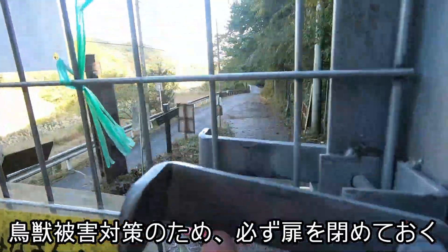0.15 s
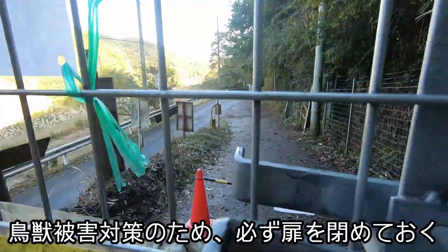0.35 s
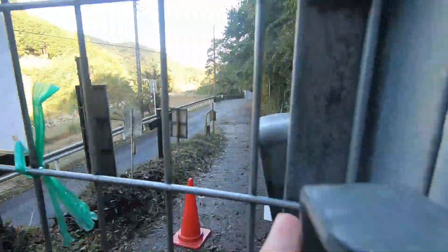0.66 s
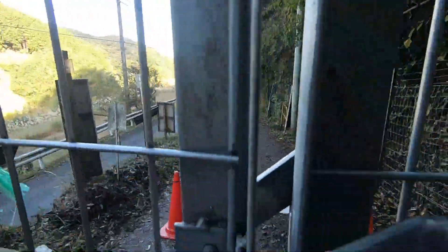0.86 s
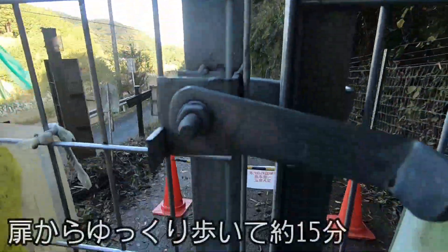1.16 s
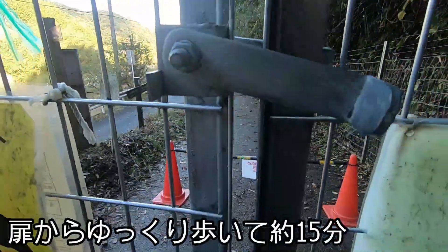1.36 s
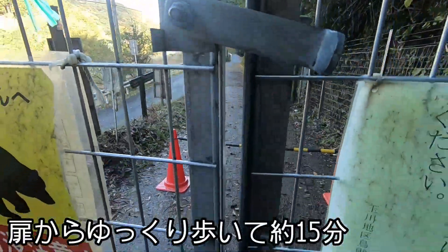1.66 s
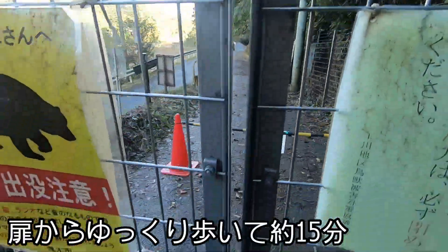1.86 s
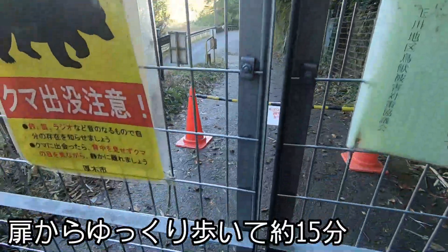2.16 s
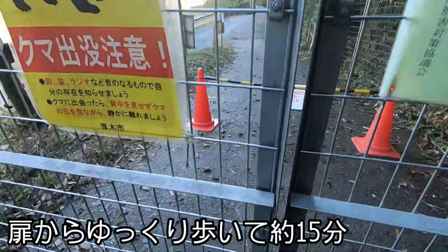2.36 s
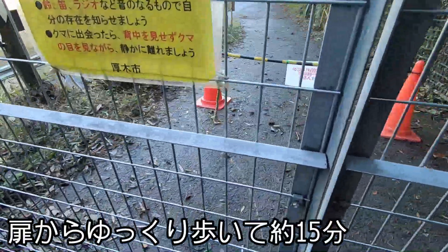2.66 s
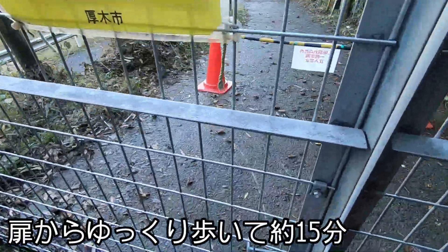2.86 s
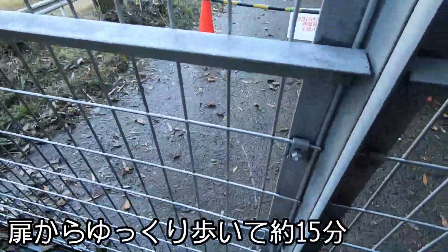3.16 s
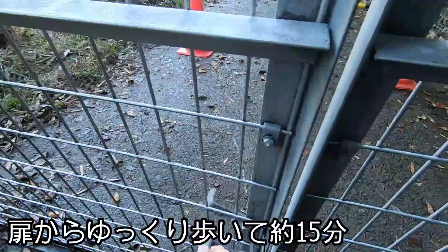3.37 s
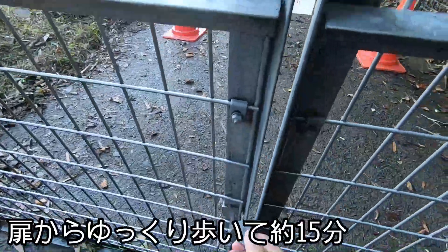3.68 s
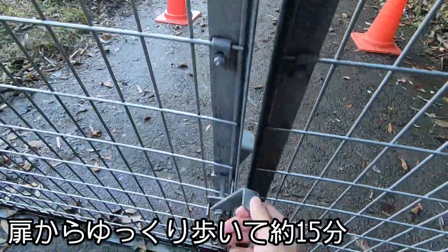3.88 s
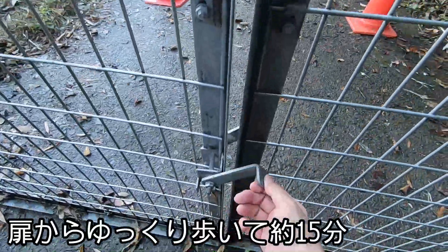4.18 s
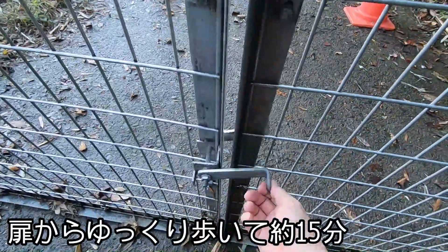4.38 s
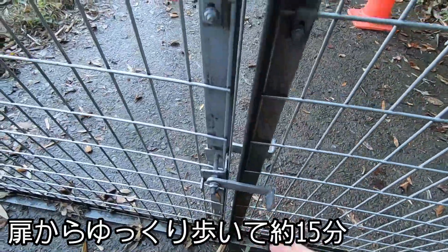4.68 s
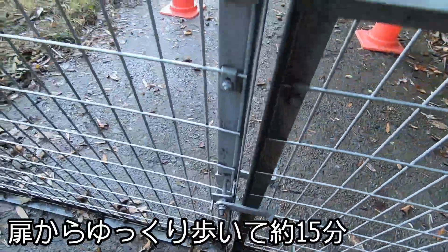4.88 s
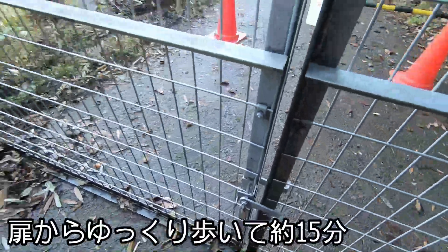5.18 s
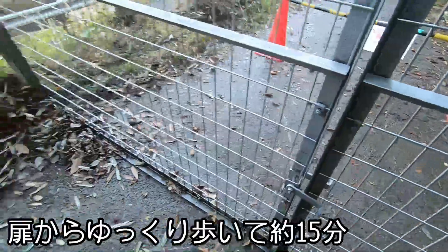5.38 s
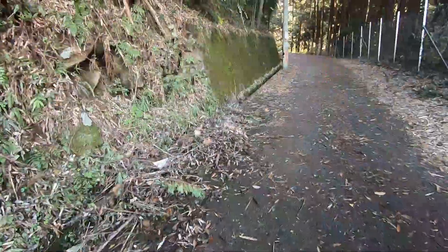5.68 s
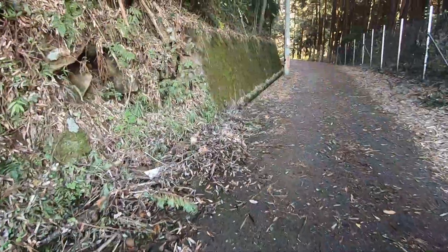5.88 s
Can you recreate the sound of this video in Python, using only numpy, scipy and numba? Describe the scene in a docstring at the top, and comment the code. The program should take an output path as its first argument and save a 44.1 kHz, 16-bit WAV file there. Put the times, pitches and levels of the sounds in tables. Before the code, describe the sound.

Low wind buffeting, strongest early, covers a thin valley hiss. Light latch knocks lead to bright, hard metal blows and scraping around one second, close to a handheld stereo microphone. Quiet gritty scuffs follow; near four seconds another latch rings in short clanks, with a final separate clack. The image narrows almost to mono, then widens, in dry open air with a slight echo off a bank.

```python
"""Wind buffets the two ports of a hand-held camera outdoors, over a distant hiss that fills the valley.
Then an arm's length away a steel mesh gate is pushed shut and two latch bars are dropped: each blow rings
decaying modes of bars and wires, and dense contacts make the frame grind. Damped swings are bumps on the
housing, bursts of filtered grains are shoe scuffs, and bands of swelling noise are the wind and hiss.
The stereo image narrows to mono by about 1.5 s, then opens out again."""
import sys
import numpy as np
from scipy import signal
from scipy.fft import rfft, irfft
from scipy.io import wavfile
from scipy.ndimage import uniform_filter1d
from numba import njit

SR = 44100
rng = np.random.default_rng(int(sys.argv[2]) if len(sys.argv) > 2 else 0)


def voltage_ratio(decibels):
    """Convert decibels (scalar or array-like) to amplitude ratios, 20 dB per decade."""
    exponent = np.asarray(decibels, float) / 20
    return 10 ** exponent


def to_wav(sig):
    """Store sig (one row per channel, or 1-D mono) as 16-bit WAV at the path in sys.argv[1].

    Samples outside -1..1 are clipped; the rate is SR.
    """
    pcm = np.clip(np.atleast_2d(sig), -1, 1) * 32767
    pcm = np.round(pcm).astype(np.int16)
    wavfile.write(sys.argv[1], SR, pcm.T)  # frames by channels


N = 266364
T = np.arange(N) / SR  # time of each sample, s

# blows on the gate: t/s, nominal peak level/dB, centre of the ring f/Hz, lift there/dB, brightness/(dB per octave)
BLOWS = [(0.277, -34.5, 1420, 8, -1), (.294, -23, 2200, 4, -0.5), (.487, -31, 2014, 8.5, -7.5),
         (.519, -19.5, 2060, 11.5, 1.2), (.529, -30.5, 2580, 11.5, 1), (0.903, -14.5, 1612, -3, 4),
         (.911, -13.5, 2240, 16, 6.5), (.917, -12, 3270, 7, 2.5), (.93, -29.5, 1705, 4.5, 1.5),
         (1.039, -19.5, 4290, 15, 9), (1.048, -13.5, 3310, 6.5, 6), (1.057, -25.5, 3400, 12.5, -10),
         (1.085, -33, 2190, 15, -3), (1.201, -22.5, 1590, 9.5, -2.5), (3.744, -28, 2460, 8, -1),
         (3.844, -32.5, 2070, 11.5, -7), (4.024, -14.5, 2800, 8, 1.5), (4.051, -20, 2410, 13, -8),
         (4.16, -27.5, 2460, 10, -6), (4.244, -11, 2800, 17, 4), (4.255, -12.5, 2680, 18.5, -4.5),
         (4.289, -29, 2410, 1, -0.5), (4.403, -32.5, 2130, 15, -14.5), (4.428, -26.5, 2700, 12, -3),
         (4.492, -24.5, 3250, 2, 0), (4.605, -34.5, 2450, 8, -6), (4.75, -12.5, 3220, 11, 2.5),
         (4.91, -37.5, 2220, 1, -6)]
# the frame grinds against the post: t of the peak/s, peak level/dB, rise/(dB/s), fall of the later chatter/(dB/s)
GRINDS = [(0.908, -19, 1300, 88), (1.066, -20, 441, 104), (1.212, -31.5, 520, 43.5),
          (1.48, -55.5, 500, 301)]
# modes of the gate and latch bars: f/Hz, relative level/dB, nominal t60/s
BAR_MODES = [(1170, -4, 0.081), (1540, -3, 0.22), (1693, 0.5, 0.19), (1772, 1, 0.08), (2070, 10, 0.032),
             (2206, 1, 0.18), (2450, -4, 0.21), (2605, -0.5, 0.1), (2727, 6.5, 0.1), (2988, 1, 0.073),
             (3203, 5.5, 0.07), (3124, -4.5, 0.17), (3320, -6.5, 0.16), (3438, 4, 0.085),
             (3670, -12.5, 0.16), (3764, -2.5, 0.18), (4550, -17.5, 0.16), (4715, -4.5, 0.19),
             (5570, -10.5, .15), (6060, -21, 0.23), (5650, -1.5, 0.086), (7250, -32, 0.1), (7400, -20, 0.1)]
# colour of the mesh wires: f/Hz, relative level/(dB per Hz)
MESH_COLOUR = [(240, -78), (400, -47.5), (738, -8), (942, -38), (1190, -9), (2190, 0), (2590, -7.5),
               (2840, -15), (4350, -11), (4700, -11.5), (6380, -16.5), (7210, -14), (10500, -39),
               (15500, -69.5)]
# typical decay of the mesh wires: f/Hz, nominal t60/s
MESH_DECAY = [(600, 0.6), (1600, 0.068), (4200, 0.13), (11000, 0.15)]
# shoe scuffs and small ticks: t/s, nominal peak level/dB, centre f/Hz, t60/s
SCUFFS = [(1.836, -44.5, 1130, 0.099), (1.955, -41, 1140, 0.072), (2.442, -46, 1540, 0.079),
          (2.53, -56.5, 695, .045), (3.155, -46, 1950, 0.26), (3.164, -67, 5100, .091),
          (3.276, -44.5, 1790, .07), (3.426, -48, 1950, 0.12), (3.502, -42.5, 1720, 0.22),
          (3.557, -43, 1590, 0.087), (5.02, -64, 5500, .041), (5.298, -64, 5500, .052),
          (5.66, -57, 666, 0.017), (5.738, -53.5, 3670, 0.071), (5.783, -58, 1750, 0.044),
          (5.834, -47.5, 1520, 0.08)]
# bumps on the housing: t/s, swing level/dB, f/Hz, swing length/s, snap level/dB, signed size of the first swing
BUMPS = [(.281, -8, 60.6, .0073, -38.5, 1), (.524, -11.5, 101.3, .0058, -47, -.56),
         (1.428, -33.5, 115, .0052, -60, -1.1), (.971, -21.5, 72, .0021, -60, -1),
         (.981, -11.5, 51.5, .01, -35, -1)]
# strength of the wind on the ports between gusts: t/s, level/dB
WIND_STRENGTH = [(0, -27.5), (.25, -30.5), (.45, -30), (.9, -26), (1.25, -29), (1.37, -31.5), (1.75, -36.5),
                 (2.1, -29.5), (2.3, -37.5), (2.65, -40), (2.95, -31), (3.35, -38), (3.55, -42),
                 (3.75, -31.5), (4.4, -39), (4.5, -45), (5.4, -40.5), (6.04, -39.5)]
# turbulence as buffet, flutter, housing drone, rush: centre f/Hz, width/Hz, level/dB in wind of -35 dB,
# growth/(dB per dB of wind), flicker scale/dB
WIND_BANDS = [(18, 38.3, -35, 1, 7), (61.66, 67, -56, 1.51, 3), (134.2, 89, -61, 0.84, 7.5),
              (227, 133, -79.5, 0.43, 7.5)]
# gusts that stand out in the bass: t of the peak/s, buffet level/dB, flutter level/dB, length/s
GUSTS = [(.412, -21.5, -33, 0.049), (.61, -18.5, -42.5, 0.061), (.7, -15.5, -27.5, 0.018),
         (.82, -30, -34, 0.016), (.95, -25.5, -26.5, .04), (1.17, -19.5, -40.5, 0.033),
         (1.224, -17, -36, 0.033), (1.41, -27, -40, 0.014), (1.6, -19.5, -51.5, 0.025),
         (2.05, -32.5, -58, 0.029), (2.38, -32.5, -44, 0.024), (2.48, -28, -47.5, .03),
         (2.8, -37, -45.5, 0.024), (3.21, -24, -44, 0.073), (3.42, -31, -55.5, 0.058),
         (4.66, -37, -56.5, .03), (4.91, -34.5, -59, 0.04), (5.17, -36, -60.5, .04),
         (5.55, -37.5, -56.5, 0.045), (5.88, -36, -62, 0.024)]
# puffs that set the housing droning: t of the peak/s, drone level/dB, rush level/dB, length/s
PUFFS = [(0.287, -34.5, -51.5, 0.031), (.35, -39, -81, .03), (0.416, -47, -61, .03),
         (0.521, -37, -52, 0.06), (0.493, -45, -53.5, 0.025), (0.633, -45.5, -55, .05),
         (.95, -44, -46.5, 0.03), (1.03, -51, -58, .05), (1.167, -49.5, -61.5, 0.11),
         (1.913, -54.5, -80, .1), (2.524, -52.5, -76, 0.024), (2.794, -58, -82, 0.019),
         (3.206, -55, -87, .1), (3.676, -52, -71, .025), (4.542, -62, -95, 0.04), (5.044, -51, -78, 0.0096),
         (5.343, -49, -74, 0.01), (5.416, -57.5, -96, 0.037), (5.81, -50, -74.5, 0.021)]
# strength of the valley hiss: t/s, level/dB
HISS_LEVEL = [(0, -60.5), (.5, -57.5), (1.5, -57.5), (2, -60), (3, -59), (4.5, -57.5), (5.3, -57.5),
              (6.04, -60)]
# colour of the hiss through one port: f/Hz, relative level/(dB per Hz)
HISS_ONE_PORT = [(250, -13.5), (420, -15.5), (600, -15), (900, -10.5), (1300, -10.5), (1620, 3),
                 (1850, -10), (2100, -7), (2650, -15.5), (3300, -7), (3800, -14.5), (4700, -23),
                 (5300, -31), (8300, -37.5), (14000, -62.5)]
# colour of the hiss through the pair of ports: f/Hz, relative level/(dB per Hz)
HISS_TWO_PORTS = [(240, -36.5), (400, -15.5), (451, -17.5), (500, -22.5), (547, -36.5), (598, -26.5),
                  (736, -8.5), (920, -23.5), (1180, -6.5), (2180, -0.5), (3310, -6), (4260, -20),
                  (4730, -18.5), (5820, -22), (14000, -52)]
# opening of the stereo image: t/s, width (0 mono to 1 full)
STEREO_WIDTH = [(0, 0.43), (.3, 0.14), (.6, .06), (.95, .01), (1.5, 0), (1.7, 0.24), (2.2, 0.55), (3, 0.88),
                (4, 0.87), (6.04, 0.92)]
# relation of the two ports: f/Hz, likeness (0 to 1), phase by which left leads/rad, left minus right/dB
PORTS = [(30, 1, 0.13, -1.15), (144, 0.99, 0.12, -2.5), (261, 0.7, 0.33, -.5), (423, 0, 2.7, 2),
         (780, 0.99, 4.88, -3), (1390, 1, 1.58, -3), (1950, 0.9, 1.3, -1), (2800, 0.1, 0.22, -4),
         (3810, 0.6, 0.46, -1.5), (5500, 1, 4, -7), (7700, 0.5, 4.03, 1), (11500, 0.93, 5.1, -3)]
# colour of the single port against the pair, for near sounds: f/Hz, level/dB
SINGLE_PORT = [(250, 30), (420, 29), (560, 9), (740, -14), (950, 8), (1200, 3.5), (1550, 11), (2300, -0.4),
               (3300, 5), (4700, 2), (6000, -6.5), (7200, -1), (9000, 5), (11000, 4)]

MESH_DB = -13  # offset of the wires against the bars
# a hard blow leaves steel pressed on steel, a light tap lets it ring: length factor at -21 dB, change per dB
RING, RING_PER_DB = 0.73, -.012
GRIND_FALL_DB_S, CHATTER_DB = 619.5, -16.5  # fall from the peak; chatter against the peak
GRIND_FROM_S, GRIND_TO_S = .86, 1.53
SLOPE_DB, SLOPE_T60_S = -13, 0.37  # echo of the bank beside the path
SWELL_RISE = 0.64  # rise time as a share of the fall time


def gate():
    """Modal excitation: blows and grinding contacts ring the steel, and the bank returns an echo."""
    modes = steel()
    out = blows(modes)
    # keep the blows' ring above about 1 kHz
    out = signal.sosfilt(signal.butter(6, 1020, "highpass", fs=SR, output="sos"), out)
    add(out, grinding(modes), GRIND_FROM_S)
    out = signal.sosfilt(signal.butter(3, [250, 11500], "bandpass", fs=SR, output="sos"), out)
    return out + slope(out)


def blows(modes):
    """Impact excitation: one contact and a dying rattle drive the modes, a longer push favouring low ones."""
    out, t = np.zeros((2, N)), T[:int(.3 * SR)]
    for s, db, hz, lift_db, bright_db in BLOWS:
        longer = max(RING + RING_PER_DB * (db + 21), .2)
        octaves = np.log2(modes[0] / hz)
        # loose wires and the bar keep tapping after the first contact
        chance = rng.random((2, len(t)))
        taps = (chance[0] < 700 / SR) * (chance[1] - .5)
        force = taps * 0.47 * np.exp(-t / (0.04 * longer))
        force[0] = 1
        # a dull blow is a longer push, which leaves the top modes still
        cutoff = min(hz * 2 ** (2.0 + bright_db / 6), 15000)
        force = signal.lfilter(*signal.butter(2, cutoff, fs=SR), force)
        colour_db = lift_db * np.exp(-(octaves / 0.31) ** 2) + bright_db * octaves
        blow = strike(force, modes, colour_db + port_db(modes[0], s), longer)
        # the first moments lie a crest factor under the peak
        level = voltage_ratio(db - 11.0) / np.std(blow[:, :int(.012 * SR)])
        fade = np.minimum(1, (t[-1] - t) / .05)
        add(out, blow * level * fade, s)
    return out


def grinding(modes):
    """Friction as a dense train of random contacts driving damped modes, under a level envelope."""
    t = np.arange(GRIND_FROM_S, GRIND_TO_S, 1 / SR)
    contacts = (rng.random(len(t)) < 1500 / SR) * rng.standard_normal(len(t))
    contacts = contacts * voltage_ratio(2.9 * walk(69.5)[:len(t)])
    # keep the grinding contacts between about 450 Hz and 8 kHz
    contacts = signal.sosfilt(signal.butter(2, [450, 8000], "bandpass", fs=SR, output="sos"), contacts)
    colour_db = 0.5 * np.log2(modes[0] / 2500) + port_db(modes[0], t[0])
    # pressed steel is damped, so the grind rings short
    rub = unit(strike(contacts, modes, colour_db, 0.22))
    return rub * voltage_ratio(grind_db(t)) * np.minimum(1, (t[-1] - t) / 0.022)


def grind_db(t):
    """Exponential rise and two-stage decay: each grind peaks, drops fast and leaves a slower chatter."""
    power = 0
    for s, db, rise, fall in GRINDS:
        early, late = np.maximum(s - t, 0), np.maximum(t - s, 0)
        after = voltage_ratio(-GRIND_FALL_DB_S * late) ** 2 + voltage_ratio(CHATTER_DB - fall * late) ** 2
        power = power + voltage_ratio(db - rise * early) ** 2 * after
    return 10 * np.log10(power)


def steel(count=540):
    """Modal density: distinct bar modes among wire modes scattered evenly on a log axis."""
    hz = np.geomspace(300, 14000, count) * (1 + 0.002 * rng.standard_normal(count))
    t60 = read(MESH_DECAY, hz) * np.exp(0.23 * rng.standard_normal(count))
    # offset for the spacing of the modes and for their decay
    db = read(MESH_COLOUR, hz) + 10 * np.log10(hz / 2500 / t60) + MESH_DB
    bar_hz, bar_db, bar_t60 = np.transpose(BAR_MODES)
    return np.append(hz, bar_hz), np.append(db, bar_db), np.append(t60, bar_t60)


def strike(force, modes, lift_db, longer):
    """Modal participation: a strike on a new spot gives each mode a new share and phase."""
    hz, db, t60 = modes
    chance = rng.random((3, len(hz)))
    share_db = 16.0 * (chance[0] - .5)
    gain = voltage_ratio(db + lift_db + share_db) * np.exp(2j * np.pi * chance[1:])
    pole = np.exp((2j * np.pi * hz - np.log(1000) / (t60 * longer)) / SR)
    return ring(force + 1e-18, pole, gain)


@njit
def ring(force, pole, gain):
    """Superposition of damped resonators under one force; each port hears them with its own phases."""
    out = np.zeros((2, len(force)))
    for k in range(len(pole)):
        z = 0j
        for i in range(len(force)):
            z = z * pole[k] + force[i]
            out[0, i] += (gain[0, k] * z).imag
            out[1, i] += (gain[1, k] * z).imag
    return out


def slope(x):
    """Diffuse reflection: scattered echoes from the bank and trees, duller than the direct sound."""
    t = T[:int(.6 * SR)]
    tail = rng.standard_normal((2, len(t))) * voltage_ratio(-60 * t / SLOPE_T60_S) * np.minimum(t / 0.023, 1)
    tail = signal.sosfilt(signal.butter(1, 4000, fs=SR, output="sos"), tail)
    tail = tail / np.linalg.norm(tail[0])
    return voltage_ratio(SLOPE_DB) * signal.fftconvolve(x, tail, axes=1)[:, :N]


def port_db(hz, s):
    """Directional colouring: near sounds take on the single port's colour as the image nears mono."""
    width = np.clip(np.interp(s, *np.transpose(STEREO_WIDTH)), 0, 1)
    return (1 - width) * read(SINGLE_PORT, hz)


def scuffs():
    """Granular friction: short decaying bursts of grit, each in its own broad band."""
    out, t = np.zeros((2, N)), T[:int(.12 * SR)]
    for s, db, hz, t60 in SCUFFS:
        grains = rng.standard_normal((2, len(t))) * rng.random(len(t)) ** 1.4
        grit = grains * np.minimum(t / .005, 1) * voltage_ratio(-60 * t / max(t60, .01))
        band = signal.butter(2, [hz / 1.27, hz * 1.41], "bandpass", fs=SR, output="sos")
        scuff = signal.sosfilt(band, grit)
        add(out, scuff * voltage_ratio(db - 10) / np.std(scuff[0, :int(.01 * SR)]), s)
    return out


def bumps():
    """Damped oscillation: with a dull snap the housing swings one way or the other and dies in a few cycles."""
    out, t = np.zeros((2, N)), T[:int(.15 * SR)]
    snap_band = signal.butter(2, [150, 520], "bandpass", fs=SR, output="sos")
    for s, db, hz, length, snap_db, way in BUMPS:
        envelope = t / length * np.exp(1 - t / length)
        swing = way * envelope * np.sin(2 * np.pi * hz * t)
        snap = signal.sosfilt(snap_band, rng.standard_normal(len(t)) * np.exp(-t / 0.016))
        add(out, voltage_ratio(db) * swing, s)
        add(out, voltage_ratio(snap_db) * snap[None] / np.std(snap[:int(.01 * SR)]), s - .004)
    return out


def wind():
    """Turbulent pressure: four steep noise bands follow the wind and flicker; gusts and puffs add power."""
    out, gust = 0, walk(15)
    strength = curves(WIND_STRENGTH)[0] + 35  # dB against the reference wind
    # one swell for each band: buffet and flutter from the gusts, drone and rush from the puffs
    extra = [swells(table, column) for table in (GUSTS, PUFFS) for column in (1, 2)]
    for swell, (hz, width, db, follow, flicker_db) in zip(extra, WIND_BANDS):
        band = shaped(lambda f: 1 / (1 + ((f - hz) / (width / 2)) ** 4))
        steady = voltage_ratio(db + follow * strength + 2.5 * gust + flicker_db * walk(18))
        swell = swell * voltage_ratio(4.7 * walk(24.77)) ** 2
        out = out + band * np.sqrt(steady ** 2 + swell)
    return out


def swells(table, column):
    """Addition of power: bell-shaped swells that rise faster than they fall."""
    power = 0
    for row in table:
        late = (T - row[0]) / max(row[-1], .01)
        late = late / np.where(T < row[0], SWELL_RISE, 1)
        power = power + voltage_ratio(row[column]) ** 2 * np.exp(-late ** 2)
    return power


def hiss():
    """Incoherent sum of distant leaves and water as noise; its colour follows the stereo width."""
    width = np.clip(curves(STEREO_WIDTH)[0], 0, 1) ** 1.8
    mono = shaped(lambda f: voltage_ratio(read(HISS_ONE_PORT, f)))
    pair = shaped(lambda f: voltage_ratio(read(HISS_TWO_PORTS, f)))
    level = voltage_ratio(curves(HISS_LEVEL)[0] + 0.89 * walk(8.2))
    return (np.sqrt(1 - width) * mono + np.sqrt(width) * pair) * level


def shaped(gain):
    """Spectral filtering: two unrelated noises with a gain for each frequency, at a common rms of 1."""
    spectrum = rfft(rng.standard_normal((2, N)))
    return unit(irfft(spectrum * gain(np.fft.rfftfreq(N, 1 / SR)), N))


def walk(rate):
    """Low-frequency fluctuation: random levels held for 1 / rate s and smoothed twice."""
    hold = int(SR / rate)
    steps = np.repeat(rng.standard_normal(N // hold + 1), hold)
    return uniform_filter1d(uniform_filter1d(steps, hold), hold)[:N]


def unit(x):
    """Normalisation of the mean square: scale to rms 1."""
    return x / np.sqrt(np.mean(x ** 2))


def read(table, hz):
    """Logarithmic interpolation: table value at each frequency, straight on a log axis."""
    f, v = np.transpose(table)
    return np.interp(np.log(np.maximum(hz, 1)), np.log(f), v)


def curves(table):
    """Linear interpolation in time: columns of a table at every sample."""
    s, *columns = np.transpose(table)
    return [np.interp(T, s, c) for c in columns]


def add(out, x, s):
    """Superposition: mix in a sound at s seconds."""
    i = int(s * SR)
    out[:, i:i + x.shape[-1]] += x[..., :N - i]


def scene():
    """Superposition of all sources, as two arrivals for the ports to combine."""
    return gate() + scuffs() + bumps() + wind() + hiss()


def low_pass(x):
    """Removes everything above the highest recorded frequency."""
    return signal.sosfilt(signal.butter(12, 15650, fs=SR, output="sos"), x)


def record(dry):
    """Partial coherence: the ports share sound with a phase lead; the side signal follows the width."""
    size = 2 * N
    hz = np.fft.rfftfreq(size, 1 / SR)
    ports = np.array(PORTS)
    alike, lead, tilt_db = (read(ports[:, [0, k]], hz) for k in (1, 2, 3))
    alike = np.clip(alike, 0, 1)
    # the left port hears a; the right hears a through shared, and b through own
    shared = voltage_ratio(-tilt_db) * alike * np.exp(-1j * lead)
    own = voltage_ratio(-tilt_db) * np.sqrt(1 - alike ** 2)
    # the sound runs on smoothly past both ends
    onward = 2 * np.linspace(dry[:, -1], dry[:, 0], N, axis=1) - dry[:, ::-1]
    a, b = rfft(np.hstack([dry, onward])) / np.sqrt(abs(1 + shared) ** 2 + own ** 2)
    mid = irfft(a * (1 + shared) + b * own, size)[:N]
    difference = a * (1 - shared) - b * own
    width = np.clip(curves(STEREO_WIDTH)[0], 0, 1.2)
    bass = 1 / (1 + (hz / 300) ** 4)
    # the bass, where the wind sits, is the last to open out
    side = irfft(difference * bass, size)[:N] * width ** 3.4
    side = side + irfft(difference * (1 - bass), size)[:N] * width
    mix = np.array([mid + side, mid - side])
    return low_pass(mix)


dry = scene()
out = record(dry)
to_wav(out)
```